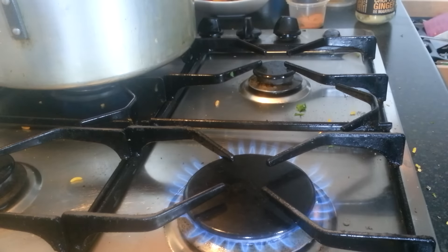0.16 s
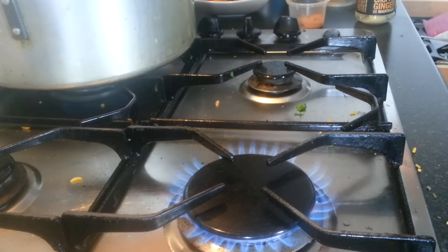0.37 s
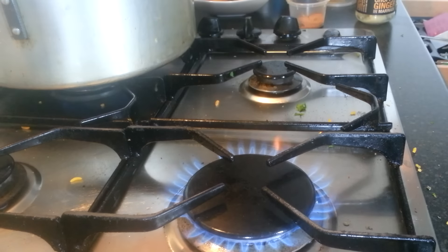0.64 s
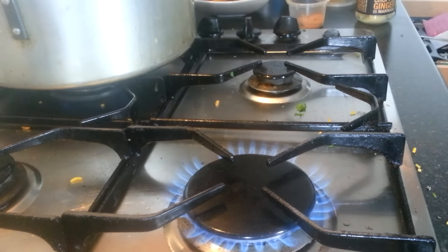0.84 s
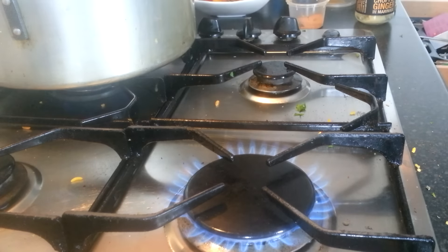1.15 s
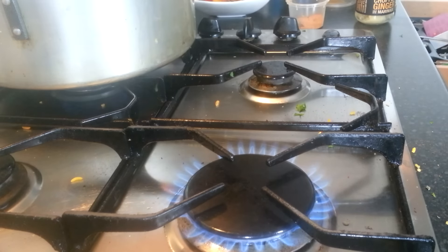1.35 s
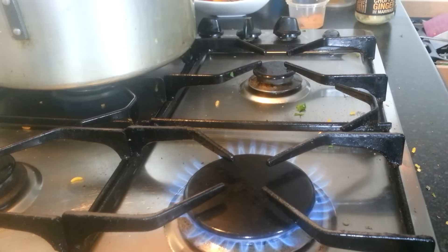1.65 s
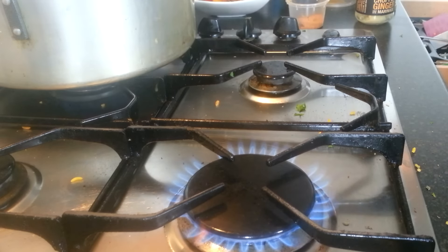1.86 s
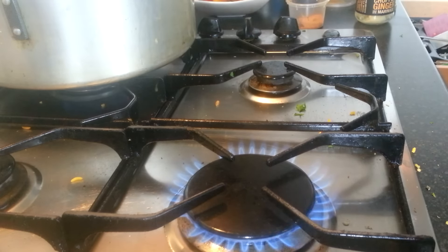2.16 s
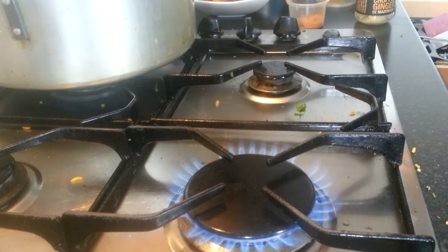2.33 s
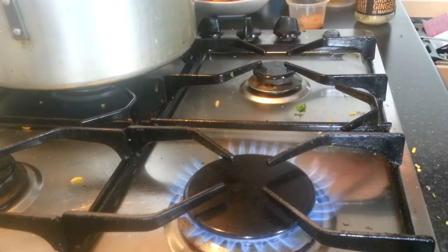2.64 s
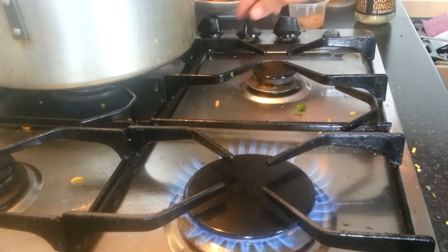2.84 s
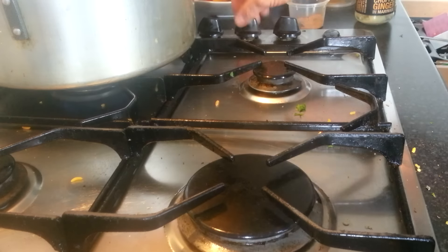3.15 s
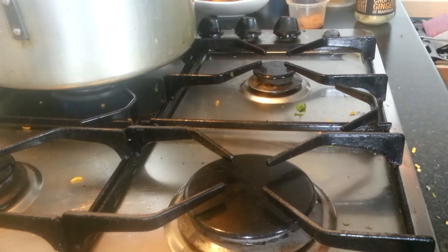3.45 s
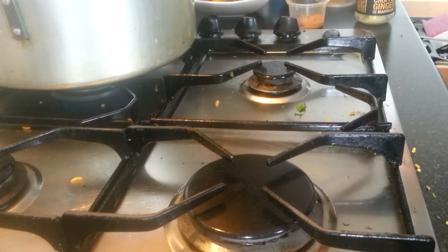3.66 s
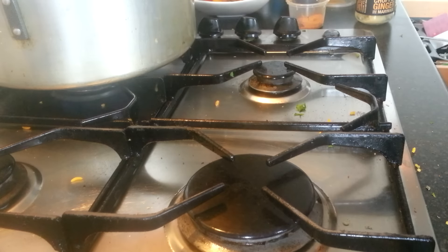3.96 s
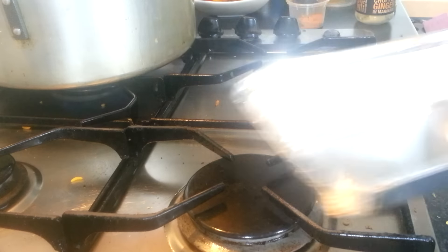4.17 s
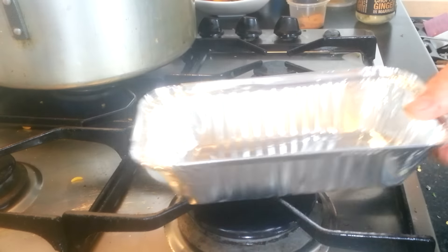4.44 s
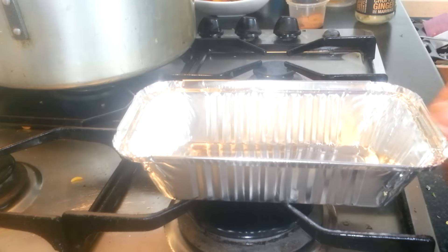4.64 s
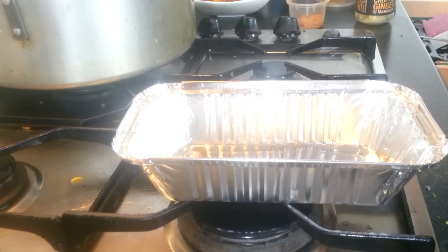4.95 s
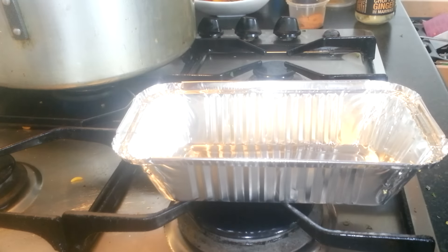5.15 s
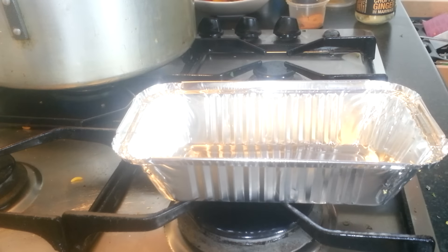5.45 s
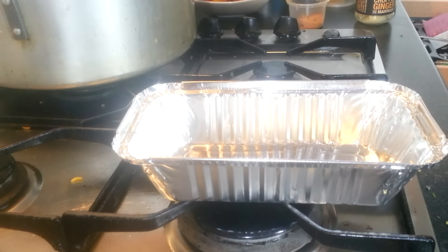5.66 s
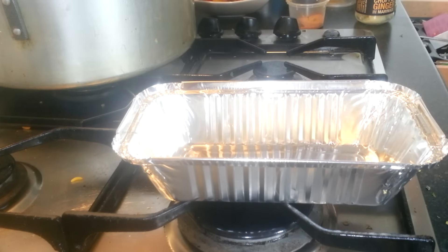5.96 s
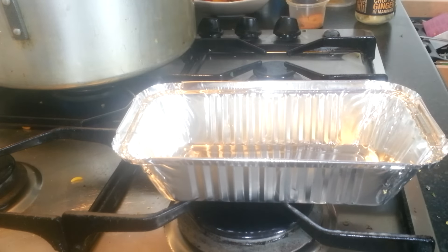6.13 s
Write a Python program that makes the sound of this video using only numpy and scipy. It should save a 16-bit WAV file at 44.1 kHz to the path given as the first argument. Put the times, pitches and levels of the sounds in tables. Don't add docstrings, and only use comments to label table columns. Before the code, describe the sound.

A metal spoon knocks and scrapes a thin aluminium pan over a hissing gas ring, the flame clicks off, foil crackles, one last scrape.

```python
import sys
import numpy as np
from scipy import signal
from scipy.fft import rfft, irfft, next_fast_len
from scipy.io import wavfile
from scipy.ndimage import uniform_filter1d

SR = 44100
rng = np.random.default_rng(int(sys.argv[2]) if len(sys.argv) > 2 else 0)


def unload_audio(sound):
    columns = np.transpose(np.atleast_2d(sound))
    steps = np.round(np.clip(columns, -1, 1) * 32767)
    wavfile.write(sys.argv[1], SR, steps.astype(np.int16))


def undo_db(level):
    steps = np.asarray(level, float) / 20
    return 10 ** steps


N = 277830
HZ = np.maximum(np.fft.rfftfreq(next_fast_len(N + SR), 1 / SR), 1)

# [t/s, peak level/dB, bass level/dB, treble level/dB, chatter t60/s]
PAN_BLOWS = [(.3363, 5, -5.5, -42, 0.021), (.3474, 2.5, -34, -27, 0.031), (.479, -40, -40, -44, 0.23),
             (.558, 3.5, -0.5, -19, 0.034), (.6378, -2.5, -20, -30, 0.08), (.6125, -19, -22, -10, 0.047),
             (.7075, -12, 1, 4, 0.11), (.7465, -7, -12, -31, 0.22), (.7955, -15, -27, -36.5, 0.059),
             (.8534, -20.5, -34, -2, 0.2), (.896, -26, -10, -19, 0.08), (2.0305, -14, 5, -14, 0.046),
             (2.0362, -6, -10.5, -8, 0.054), (2.0494, -3.5, -11, -6.5, 0.038), (2.0888, -19.5, 4, -6, 0.24),
             (2.2335, -18.5, 4, -26, 0.057), (2.2424, -11, -7, -31, 0.057), (2.259, -18, -20, -38, 0.037),
             (2.2724, -14, 1.5, -58, 0.059), (2.3112, -8.5, -12, 0, 0.028), (2.3254, -14.5, -48, -43, 0.18),
             (5.8625, -23.5, 7, 3.5, 0.024), (5.8717, -15, -19, -12, 0.027), (5.878, -23, 5.5, -7, 0.05),
             (5.969, -33, 17, -3, 0.023), (6.0035, -26.5, 11, -16, 0.027), (6.0306, -13, 7.5, -7.5, 0.026)]
# [t/s, length/s, first level/dB, last level/dB, treble level/dB]
PAN_STROKES = [(0.337, 0.19, -5.5, -18.5, -26), (0.568, 0.18, -10.5, -18.5, -31),
               (0.704, 0.037, -2, -45, -9), (0.804, 0.32, -16, -46, -7.5), (2.064, 0.082, -9.5, -32, -30),
               (2.172, 0.07, -23, -24.5, -9.5), (2.244, 0.087, -20.5, -13, -38),
               (2.311, 0.031, -7.5, -13.5, 5.5), (2.348, 0.14, -9.5, -32, -12.5),
               (5.831, 0.045, -28, -27, -16), (5.87, 0.084, -34, -32, -3), (5.951, 0.11, -23.5, -31.5, -12),
               (6.039, 0.14, -23.5, -44.5, -6)]
# [t/s, upper over lower middle level/dB]
SPOON_HARDNESS = [(.33, -6), (.4, 4), (.55, -9.5), (.6, 9), (.7, 10.5), (.95, 8), (2.03, 2.5), (2.1, -5.5),
                  (2.17, -14), (2.26, -6), (2.3, -2), (2.315, 3.5), (2.35, -1.5), (2.45, -1), (5.84, -1.5),
                  (5.9, 4), (6.03, -3), (6.15, -5)]
# [f/Hz, level/dB]
PAN_COLOUR = [(120, -10), (250, -20), (410, -10.5), (700, 2.5), (1300, 11), (2500, 7), (4700, 0.5),
              (7000, -1.5), (11000, -5.5), (15000, -29)]
# [f/Hz, level/dB, t60/s]
PAN_MODES = [(434.4, -1, 0.054), (510, -1, 0.011), (693, -13, 0.065), (821, -7, 0.058), (940, -0.5, 0.014),
             (1065, -14.5, 0.0094), (1290, -6.5, 0.0087)]
# [start/s, end/s]
STRUCK_SPOON_MODES = [(3135, -16, 0.25), (3591, -24, .1), (3919, -19, 0.3), (5163, -22, 0.3),
                      (6083, -22, .4), (6207, -22, .4), (7090, -29, 0.3), (7467, -8, 0.18),
                      (7639, -19, 0.3), (8177, -36, 0.38), (8678, -26, 0.3), (9292, -17, 0.12),
                      (9851, -22, 0.13), (10290, -23, 0.24), (11160, -12, 0.13), (11780, -34, 0.42),
                      (12040, -25, 0.19), (12620, -29, 0.19), (13500, -29, 0.24), (14270, -25, 0.16)]
STRUCK_SPAN = (.55, .61)
# [start/s, end/s]
SHAKEN_SPOON_MODES = [(7000, -15, .08), (7461, -7, .13), (7644, -12, .15), (8662, -6, .16), (9310, -9, .1),
                      (9850, -12, .1), (10300, -8, .14), (10700, -13, .1), (11170, -7, .12),
                      (11780, -13, .1), (12040, -12, .13), (12620, -13, .13), (12840, -12, .12),
                      (13320, -13, .14), (13500, -13, .14), (14300, -11, .14)]
SHAKEN_SPAN = (.7, 1.0)
# [start/s, end/s]
RIM_MODES = [(415, -4, .15), (680, -8, .06), (937, -8, .07), (1312, -3, .08), (1520, -7, .1),
             (2092, -2, .1), (2625, -4, .08), (3140, 0, .09), (3595, -6, .08), (3919, -3, .2),
             (4650, -9, .06), (5160, -6, .15), (6083, -8, .2), (6203, -9, .2)]
RIM_SPAN = (.55, 1.0)
# [start/s, end/s]
LAST_SCRAPE_MODES = [(415, 1, .06), (675, 0, .06), (1030, -6, .05), (1312, 0, .06), (1510, -2, .06),
                     (2085, -9, .04), (3142, 0, .045), (3400, -1, .04), (3800, -3, .03), (4750, 0, .025),
                     (8630, -22, .15), (10640, -16, .12), (11200, -18, .13), (12600, -17, .13),
                     (13570, -17, .13), (14350, -17, .12)]
LAST_SCRAPE_SPAN = (5.8, 6.15)
# [f/Hz, level/dB, t60/s]
BOWL_MODES = [(1150, -3, .015), (1330, 0, .02), (1600, -2, .012)]
# [t/s, level/dB]
BOWL_FLATNESS = [(.33, -31), (.37, -32), (.4, -27.5), (2.13, -35), (2.17, -20.5), (2.22, -21),
                 (2.28, -31.5), (2.3, -48)]
# [start/s, end/s]
TIP_MODES = [(2600, -22, .005), (4700, -15, .004), (5500, -15, .004)]
TIP_SPAN = (2.31, 2.345)
# [start/s, end/s]
HANDLE_MODES = [(9850, -49, .08), (11650, -49, .07), (11900, -48, .07), (13700, -55, .08)]
HANDLE_SPAN = (.336, .52)

# [t/s, peak level/dB, bass level/dB, treble level/dB, chatter t60/s]
FOIL_SNAPS = [(3.7509, -24.5, -0.5, 1, 0.063), (3.7761, -9.5, -10, -19, 0.035),
              (3.784, -14, -17, -32, 0.082), (3.7945, -20.5, -27, -34, 0.099),
              (3.806, -28, -23, -34, 0.059), (4.023, -5.5, -16, -30, 0.021), (4.0255, -15, -16, -40, 0.14),
              (4.4321, -10.5, 0, -38, 0.044), (4.438, -13.5, -12, -40, 0.035),
              (4.4444, -5.5, -40, -44, 0.14), (4.472, -11, -23, -9, 0.0091), (4.5105, -17, -15, -15, 0.07),
              (4.521, -23.5, -22, -8, 0.19), (4.5697, -21, -36, -24, 0.1), (4.585, -30, -10, -19, 0.054),
              (4.612, -30, -18, -18, 0.032), (4.667, -24.5, -42, -6, 0.084), (4.755, -28, -29, -16, 0.1),
              (4.866, -37, -3, -7, 0.022)]
# [t/s, length/s, first level/dB, last level/dB, treble level/dB]
FOIL_RUSTLE = [
    (3.766, 0.024, -33, -39, -18),
    (3.785, 0.055, -13.5, -28, -33),
    (3.857, 0.041, -45, -45, 10),
    (3.899, 0.097, -33.5, -41, 10.5),
    (4.037, 0.26, -34, -43.5, 4.5),
    (4.479, 0.181, -22, -27.5, -15),
    (4.647, 0.077, -27, -27, -17),
    (4.719, 0.37, -33.5, -43, -9),
]
# [t/s, upper over lower middle level/dB]
FOIL_HARDNESS = [(3.75, 10), (3.8, 6), (3.88, -24), (3.95, 6), (4.02, 9), (4.1, -4.5), (4.43, 9),
                 (4.55, -3.5), (4.9, -4.5)]
# [f/Hz, level/dB]
FOIL_COLOUR = [(150, -3.5), (350, -12), (800, 9.5), (1200, 4.5), (1800, 3), (2700, 0.5), (4500, -6.5),
               (7000, -11.5), (9500, -13), (11000, -17.5), (15000, -34)]
# [f/Hz, level/dB, t60/s]
FOIL_MODES = [(426, 7.5, 0.031), (800, -26, 0.041), (1020, -15, 0.011), (1470, -12, 0.014),
              (2910, 7.5, 0.0062)]
# [start/s, end/s]
LIFTED_TRAY_MODES = [(980, -8, .025), (1940, 1, .025), (2470, -7, .02), (2920, -7, .018), (1600, -6, .02),
                     (4300, -8, .01)]
LIFTED_SPAN = (3.77, 3.9)
# [start/s, end/s]
SEATED_TRAY_MODES = [(598, -2, .04), (805, 1, .035), (931, -4, .04), (1410, -2, .03), (2400, -2, .022),
                     (2610, -6, .02), (2950, -4, .02), (3600, -8, .015)]
SEATED_SPAN = (4.43, 4.9)

# [t/s, peak level/dB, bass level/dB, treble level/dB, chatter t60/s]
KNOB_CLICKS = [
    (3.2045, -13.5, -11.5, -23, 0.046),
]
# [t/s, length/s, first level/dB, last level/dB, treble level/dB]
KNOB_TURNING = [
    (3.15, 0.017, -46, -36.5, -25),
    (3.164, 0.044, -39, -48, -15),
    (3.197, 0.097, -44, -53, -20),
]
# [t/s, upper over lower middle level/dB]
KNOB_HARDNESS = [(3.15, -14), (3.19, -8), (3.205, 11), (3.3, 23)]
# [f/Hz, level/dB]
KNOB_COLOUR = [(400, -5), (700, 1.5), (1100, 2.5), (1800, -1.5), (2700, 2), (3800, -4.5), (5100, 4),
               (6300, -9), (12000, -15)]
# [f/Hz, level/dB, t60/s]
KNOB_MODES = [(1150, 2, .02), (2700, -2, .012), (5200, 0, .014)]
# [start/s, end/s]
SPRING_MODES = [(5050, -5, .02), (2800, -13, .015), (1250, -7, .015)]
SPRING_SPAN = (3.215, 3.31)

# [t/s, peak level/dB, f/Hz, t60/s]
SINGLE_TAPS = [(.559, -10, 3919, .5), (.559, -23, 6207, .5), (.559, -22, 6083, .5), (.638, -17, 3919, .3),
               (.709, -15, 3919, .3), (.748, -16, 3100, .15), (3.7775, -17, 1917, .05),
               (4.576, -16, 2920, .03), (4.578, -20, 830, 0.044), (5.952, -25, 4800, .06),
               (5.975, -27, 5150, .06), (6.031, -21, 5820, .03), (6.192, -34.5, 3144, .08),
               (0.3373, 3, 3240, .025), (0.342, -0.5, 1510, 0.044), (.351, -1, 1320, .04),
               (.559, 0, 717, 0.055), (.709, -10, 5100, .12), (.797, -5, 3880, 0.07), (.872, -8, 3150, .1),
               (2.3112, -4, 414, 0.061), (2.3112, -14, 2700, .02), (2.3112, -4, 4540, 0.022),
               (2.2783, -10, 1350, .02), (2.2425, -20, 3600, 0.013), (3.1585, -22, 1100, 0.026),
               (3.1636, -22.5, 1130, .04), (4.0237, -14, 2690, 0.025), (4.0232, -10, 4200, 0.015),
               (4.0222, -13, 1390, 0.022), (4.4318, -9.5, 800, 0.061), (4.4314, -12, 3020, .01),
               (4.4426, -17, 915, .03), (4.867, -27, 2920, 0.013), (6.003, -16.5, 3136, 0.081),
               (6.031, -12, 3160, 0.073), (6.032, -13, 420, 0.053), (5.958, -20, 3142, .08),
               (5.976, -18, 3120, .07), (5.962, -18, 1500, 0.048), (5.97, -19, 675, .05),
               (6.006, -18, 1510, 0.046), (6.008, -12, 420, 0.04), (5.872, -15, 1670, .04),
               (5.876, -18, 2400, 0.044), (5.867, -15, 4800, .04), (6.031, -15.5, 850, .1),
               (6.031, -12.5, 1308, 0.088), (6.033, -13, 3850, 0.045), (6.031, -17, 3520, .08)]

# [f/Hz, width/Hz, level/dB]
BURNER_WHISTLES = [(1130, 196, -1), (2344, 63, -21), (2720, 200, -19), (3316, 91, -12), (5600, 1200, -20),
                   (7380, 360, -17), (8200, 260, -12.5), (11400, 270, -41)]
# [t/s, level/dB]
GAS_FLOW = [
    (0, -38),
    (1.2, -37),
    (2.0, -37.5),
    (3.08, -37.5),
    (3.16, -54),
]
# [t/s, peak level/dB, f/Hz]
POT_GLUGS = [(3.624, -37, 585), (4.081, -24, 1360), (4.112, -24.5, 460), (4.146, -28, 510),
             (4.998, -26.5, 510), (5.059, -39, 530), (5.087, -22.5, 520), (5.598, -31, 530)]
# [f/Hz, level/dB]
STEAM_COLOUR = [(700, -5), (1500, 0), (3000, 1.5), (4600, -4), (7000, -3), (11000, -5), (14500, -5.5),
                (15500, -15)]
# [t/s, level/dB]
STEAM_FLOW = [(0, -42.5), (1.2, -43), (2.0, -41), (3.2, -43), (4.3, -41.5), (5.0, -43), (5.5, -45),
              (6.3, -43)]
# [f/Hz, level/dB]
AIR_COLOUR = [(18, -52), (30, -37), (59, -2), (86, -52), (113, 1), (194, -7), (217, 1), (240, -9.5),
              (373, -7), (526, -0.5), (571, -11), (706, -13.5), (742, -17.5), (860, -10.5), (1500, -35),
              (1950, -32), (3300, -120)]
# [nearest t/s, level/dB, half length/s]
VEHICLE_PASSES = [(.4, -66, .12), (1.5, -42, 0.25), (5.1, -49, 0.18), (5.55, -59, 0.21), (6.248, -69, .15)]

# [f/Hz, likeness/1]
NOISE_LIKENESS = [(60, 1), (180, 0.87), (550, 0.77), (1650, 0.098), (4970, -1.4), (15000, 0.093)]
# [f/Hz, level/dB]
NOISE_LEAN = [(60, -1.5), (240, -2), (950, -3), (3770, -7), (15000, -2.5)]
# [f/Hz, t60/s]
KITCHEN_DECAY = [(150, 0.86), (1000, 0.39), (4000, 0.3), (12000, 0.23)]
# [f/Hz, level/dB]
MICROPHONE_PORT = [(25, -9), (70, -24), (100, -7), (4700, 1.5), (5700, -4), (16000, -7)]
# [f/Hz, level under the mean/dB]
WEAKEST_TREBLE = [(6500, -60), (8500, -27), (11000, -19), (14000, -16)]

STROKE_ATTACK_S, STROKE_RELEASE_S = 0.013, 0.0073
BLOW_RING_DB, RING_FOLLOWS, STROKE_RING_DB = -36, 0.77, -29.5
CRACK_FOLLOWS, CRACK_T60_S = 1.6, 0.021
TWIN_SPREAD, TWIN_DB, WANDER_DB = .003, -5, 2.5


def rms_one(x):
    return x / np.sqrt(np.mean(x ** 2) + 1e-20)


def in_time(rows, off_db=-120):
    s, first, *rest = np.transpose(rows)
    t = np.arange(N) / SR
    return [np.interp(t, s, first, off_db, off_db)] + [np.interp(t, s, c) for c in rest]


def at_hz(points, hz):
    table_hz, value = np.array(points)[:, 0], np.array(points)[:, 1]
    return np.interp(np.log(hz), np.log(table_hz), value)


def drift(rate):
    r = np.exp(-80 * np.pi * rate / SR)
    slow = signal.lfilter([1], [1, -2 * r, r * r], rng.standard_normal(N // 40 + 2002))[2000:]
    return np.interp(np.arange(N) / 40, np.arange(len(slow)), rms_one(slow))


def ring(x, hz, t60):
    r, w = undo_db(-60 / (t60 * SR)), 2 * np.pi * hz / SR
    return signal.lfilter([0, np.sin(w)], [1, -2 * r * np.cos(w), r * r], x + 1e-18)


def through(x, response):
    size = next_fast_len(N + SR)
    return irfft(rfft(x, size) * response, size)[..., :N]


def band(x, low_hz, high_hz):
    return signal.sosfilt(signal.butter(2, [low_hz, high_hz], "band", fs=SR, output="sos"), x)


def colour(spectrum):
    cepstrum = irfft(np.log(undo_db(at_hz(spectrum, HZ))))
    cepstrum[1:len(HZ) - 1] *= 2
    cepstrum[len(HZ):] = 0
    return np.exp(rfft(cepstrum))


def contact(blows, slides, per_s, spread_db, slide_db, hold, apart, slide_bass_db, crack_db):
    env, first_touch = np.zeros((4, N)), np.zeros(N)
    t = np.arange(SR // 2) / SR
    for s, db, bass_db, treble_db, t60 in blows:
        at = round(s * SR)
        first_touch[at] = 0.88
        shape = undo_db(db - 60 * (t / t60) ** hold)
        ring_db = BLOW_RING_DB - (1 - RING_FOLLOWS) * db
        shares = undo_db(np.c_[[0, bass_db, treble_db, ring_db]])
        env[:, at:at + len(t)] += (shape * shares)[:, :N - at]
        crack = undo_db(CRACK_FOLLOWS * db + crack_db - 60 * t / CRACK_T60_S)
        env[2, at:at + len(t)] += crack[:N - at]
    for s, length, first_db, last_db, treble_db in slides:
        at = round(s * SR)
        ends = np.clip(np.minimum(t / STROKE_ATTACK_S, 1 + (length - t) / STROKE_RELEASE_S), 0, 1)
        shape = ends * undo_db(slide_db + first_db + (last_db - first_db) * t / length)
        shares = undo_db(np.c_[[0, slide_bass_db, treble_db, STROKE_RING_DB]])
        env[:, at:at + len(t)] += (shape * shares)[:, :N - at]
    sizes = undo_db(spread_db * np.minimum(rng.exponential(1, (3, N)), 4)) * rng.choice([-1, 1], (3, N))
    shared, *own = rms_one(sizes * (rng.random((3, N)) < per_s / SR))
    apart = np.clip(apart * np.array([1.0, 0.35, 0.99, 0.84]), 0, 1)[:, None, None]
    clicks = np.sqrt(1 - apart) * shared + np.sqrt(apart) * np.array(own)
    return env[:, None] * (first_touch + clicks)


def sheet(force, spectrum, modes, bass_hz, ring_db, level_db, edge_db=0):
    lower_middle = band(force[0] * undo_db(-edge_db / 2), bass_hz, 2110)
    upper_middle = band(force[0] * undo_db(edge_db / 2), 2470, 5770)
    bass = undo_db(13.0) * undo_db([[2.5], [-2.5]]) * band(force[1], 196, bass_hz)
    treble = undo_db(5.5) * band(force[2], 5200, 17000)
    clatter = lower_middle - upper_middle + bass + treble
    rings = sum(undo_db(db + ring_db) * ring(clatter, hz, t60) for hz, db, t60 in modes)
    return undo_db(level_db) * through(clatter + rings, colour(spectrum))


def moving_ring(force, start_s, end_s, modes, level_db):
    out, start, end = np.zeros((2, N)), round(start_s * SR), round(end_s * SR)
    touch = np.pad(force[:, start:end], ((0, 0), (0, SR // 3)))[:, :N - start]
    touch = band(touch, 250, 18000)
    stop = start + touch.shape[1]
    for hz, db, t60 in modes:
        share = undo_db(level_db + db + WANDER_DB * drift(9)[:touch.shape[1]]) * touch
        twin_hz = hz * (1 + TWIN_SPREAD * rng.uniform(-1, 1))
        twin = undo_db(TWIN_DB) * ring(share, twin_hz, min(t60, .22) / 2)
        out[:, start:stop] += ring(share, hz, t60) + twin
    return out


def spot(force, start_s, end_s, modes):
    out, start, end = np.zeros((2, N)), round(start_s * SR), round(end_s * SR)
    touch = np.pad(force[:, start:end], ((0, 0), (0, SR // 5)))
    out[:, start:start + touch.shape[1]] = sum(undo_db(db) * ring(touch, hz, t60) for hz, db, t60 in modes)
    return out


def pan_and_spoon():
    force = contact(PAN_BLOWS, PAN_STROKES, per_s=6000, spread_db=2.0, slide_db=3.0, hold=1.89,
                    apart=0.78, slide_bass_db=-3.5, crack_db=-15.0)
    hardness_db = in_time(SPOON_HARDNESS, off_db=0)[0]
    pan = sheet(force, PAN_COLOUR, PAN_MODES, bass_hz=644, ring_db=-30.0, level_db=-0.5, edge_db=hardness_db)
    pan[:, round(RIM_SPAN[0] * SR):round(RIM_SPAN[1] * SR)] *= undo_db(-0.5)
    pan[:, round(5.92 * SR):] *= undo_db(-2.5)

    steel = moving_ring(force[3], *STRUCK_SPAN, STRUCK_SPOON_MODES, level_db=18.5)
    shaking = force[3] + undo_db(-20.5) * force[2]
    steel += moving_ring(shaking, *SHAKEN_SPAN, SHAKEN_SPOON_MODES, level_db=-7.0)
    steel += moving_ring(force[3], *RIM_SPAN, RIM_MODES, level_db=-4.5)
    steel += moving_ring(force[3], *LAST_SCRAPE_SPAN, LAST_SCRAPE_MODES, level_db=-6.0)
    flat = band(force[0] * undo_db(in_time(BOWL_FLATNESS)[0]), 600, 3000)
    steel += sum(undo_db(db) * ring(flat, hz, t60) for hz, db, t60 in BOWL_MODES)
    steel += spot(force[0], *TIP_SPAN, TIP_MODES)
    steel += spot(force[0], *HANDLE_SPAN, HANDLE_MODES)
    return (pan + steel) * undo_db([[-2.8], [2.8]])


def foil_tray():
    force = contact(FOIL_SNAPS, FOIL_RUSTLE, per_s=5000, spread_db=2.0, slide_db=0.0, hold=1.48,
                    apart=0.96, slide_bass_db=-3.5, crack_db=8.5)
    hardness_db = in_time(FOIL_HARDNESS, off_db=3)[0]
    tray = sheet(force, FOIL_COLOUR, FOIL_MODES, bass_hz=714, ring_db=-36.5, level_db=0.5, edge_db=hardness_db)
    tray += moving_ring(force[3], *LIFTED_SPAN, LIFTED_TRAY_MODES, level_db=-4.0)
    tray += moving_ring(force[3], *SEATED_SPAN, SEATED_TRAY_MODES, level_db=-7.0)
    return tray * undo_db([[-2.8], [2.8]])


def knob():
    force = contact(KNOB_CLICKS, KNOB_TURNING, per_s=9400, spread_db=3.5, slide_db=-3.0, hold=0.62,
                    apart=0.44, slide_bass_db=9.0, crack_db=-20.0)
    hardness_db = in_time(KNOB_HARDNESS, off_db=0)[0]
    body = sheet(force, KNOB_COLOUR, KNOB_MODES, bass_hz=1270, ring_db=-64.0, level_db=2.5, edge_db=hardness_db)
    spring = spot(force[0], *SPRING_SPAN, SPRING_MODES)
    return (body + spring) * undo_db([[-3.2], [3.2]])


def taps():
    out = np.zeros(N + SR)
    click = 1. * (np.arange(SR // 2) == 0)
    for s, db, hz, t60 in SINGLE_TAPS:
        at = round(s * SR)
        out[at:at + len(click)] += undo_db(db) * ring(click, hz, t60)
    return out[:N] * undo_db([[-2.5], [2.5]])


def dense_modes(t60s, likeness):
    t, out = np.arange(SR * 2 // 3) / SR, 0
    edges = 80 * 2 ** np.arange(0, 8.1)
    mid, side = rng.standard_normal((2, len(t)))
    for low, high in zip(edges, edges[1:]):
        centre = np.sqrt(low * high)
        alike = np.clip(at_hz(likeness, centre), 0, 1)
        pair = np.sqrt(1 + alike) * mid + np.sqrt(1 - alike) * side * [[1], [-1]]
        fade = undo_db(-60 * t / at_hz(t60s, centre))
        out = out + band(pair, low, min(high, .45 * SR)) * fade / np.sqrt(2 * np.sum(fade ** 2))
    return rfft(out, next_fast_len(N + SR))


def kitchen(struck):
    late = np.exp(-2j * np.pi * HZ * .003)
    tail = dense_modes(KITCHEN_DECAY, likeness=[(300, 0.89), (900, 0.5), (2500, 0.14)])
    return undo_db(-1.5) * through(struck, late * tail) * undo_db([[-1.5], [1.5]])


def stereo_noise():
    mid, side = rng.standard_normal((2, N))
    alike = np.clip(at_hz(NOISE_LIKENESS, HZ), 0, 1)
    lean = undo_db(at_hz(NOISE_LEAN, HZ) / 2 * [[1], [-1]])
    return through(mid, lean * np.sqrt(1 + alike)) + through(side, lean * np.sqrt(1 - alike) * [[1], [-1]])


def flame():
    white, whistles = stereo_noise(), 0
    for hz, width, db in BURNER_WHISTLES:
        r = np.exp(-np.pi * 1.6 * width / SR)
        b, a = [1, 0.0034, -0.93], [1, -2 * r * np.cos(2 * np.pi * hz / SR), r * r]
        tone = rms_one(signal.lfilter(b, a, signal.lfilter(b, a, white)))
        flutter_db = 1.5 * drift(18)
        whistles = whistles + undo_db(db + flutter_db) * np.sqrt(width) * tone
    hiss = undo_db(-5.0) * rms_one(band(white, 310, 4100))
    hiss = hiss + undo_db(-20.0) * rms_one(band(white, 3200, 11800))
    return undo_db(in_time(GAS_FLOW)[0]) * (rms_one(whistles) + hiss)


def simmer():
    sizes = undo_db(0.82 * np.minimum(rng.exponential(1, N), 4)) * (rng.random(N) < 90 / SR)
    dealt = rng.integers(0, 10, N)
    pot = sum(ring(sizes * (dealt == k), hz, 14.7 / hz) for k, hz in enumerate(np.geomspace(330, 750, 10)))
    pot = undo_db(-40.5) * rms_one(pot)
    for s, db, hz in POT_GLUGS:
        pot += ring(undo_db(db) * (np.arange(N) == round(s * SR)), hz, 43.0 / hz)
    return band(pot, 380.0, 1700) * undo_db([[-2.2], [2.2]])


def background():
    white, t = stereo_noise(), np.arange(N) / SR
    air = undo_db(-36.5 + 0.52 * drift(2.4)) * rms_one(through(white, colour(AIR_COLOUR)))
    steam_db = in_time(STEAM_FLOW)[0] + 0.347 * drift(0.33)
    steam = undo_db(steam_db) * rms_one(through(white, colour(STEAM_COLOUR)))
    traffic = undo_db(-89) + sum(undo_db(db) * np.exp(-((t - s) / half) ** 2) for s, db, half in VEHICLE_PASSES)
    rumble = rms_one(band(rng.standard_normal(N), 49, 63))
    return air + steam + traffic * rumble


def scene():
    struck = pan_and_spoon() + foil_tray() + knob() + taps()
    return struck + kitchen(struck) + flame() + simmer() + background()


def starve(x):
    hz, _, z = signal.stft(x, SR, nperseg=2048)
    mean = np.sqrt(np.mean(np.abs(z) ** 2, axis=1, keepdims=True))
    settled = mean < 2 * np.roll(mean, 2, axis=2)
    weakest = settled * mean * undo_db(at_hz(WEAKEST_TREBLE, np.maximum(hz, 1)))[:, None]
    keep = 1 / (1 + (weakest / (np.abs(z) + 1e-12)) ** 6)
    return signal.istft(z * keep, SR, nperseg=2048)[1][:, :N]


def top_cut(x):
    return signal.sosfilt(signal.butter(12, 15600, fs=SR, output="sos"), x)


def record(dry):
    dry = np.array([np.roll(dry[0], 4), dry[1]])
    dry = through(dry, colour(MICROPHONE_PORT))
    level_db = 20 * np.log10(uniform_filter1d(np.abs(dry).max(axis=0), size=220) + 1e-9)
    fall_db = 96.0 * np.arange(N) / SR
    held_db = np.maximum.accumulate(level_db + fall_db) - fall_db
    r = np.exp(-1 / (0.052 * SR))
    cut_db = signal.lfilter([1 - r], [1, -r], 0.82 * np.maximum(held_db + 11.5, 0))
    loud = dry * undo_db(-cut_db)
    overloaded = loud / (1 + np.abs(loud) ** 6) ** (1 / 6)
    mix = starve(overloaded)
    return top_cut(mix)


dry = scene()
out = record(dry)
unload_audio(out)
```